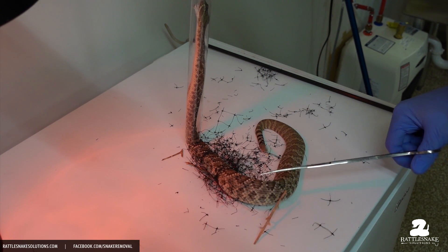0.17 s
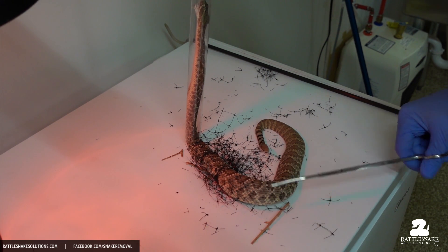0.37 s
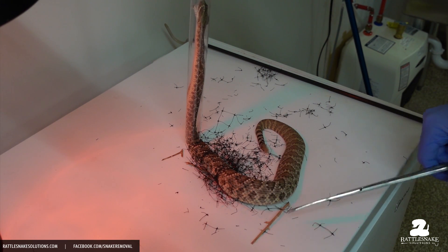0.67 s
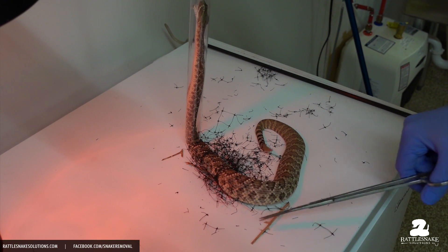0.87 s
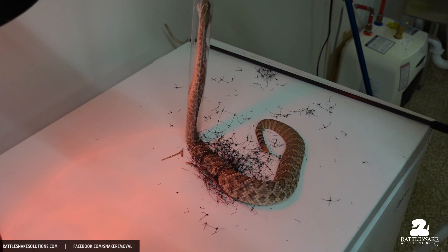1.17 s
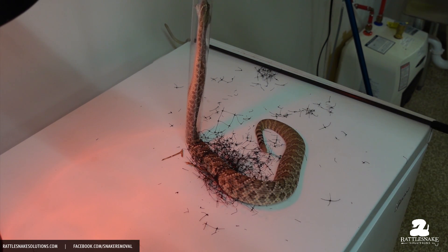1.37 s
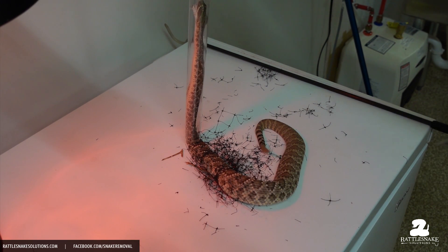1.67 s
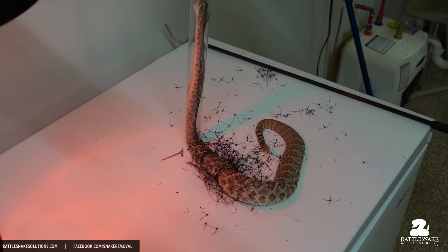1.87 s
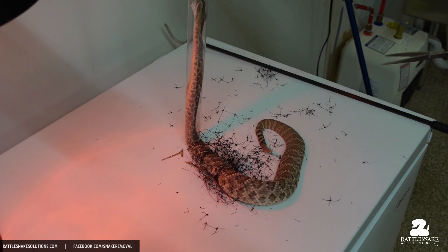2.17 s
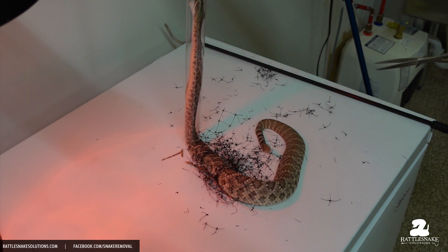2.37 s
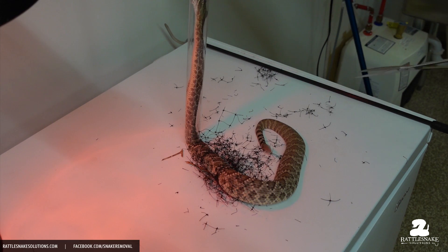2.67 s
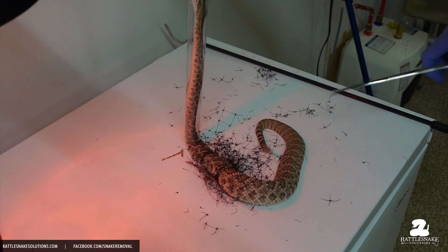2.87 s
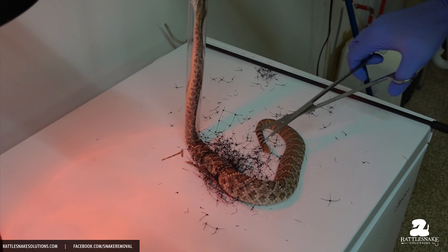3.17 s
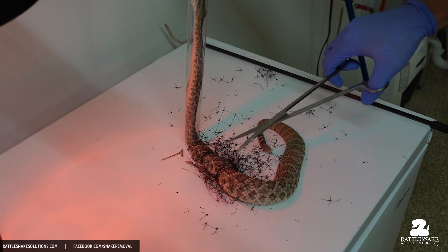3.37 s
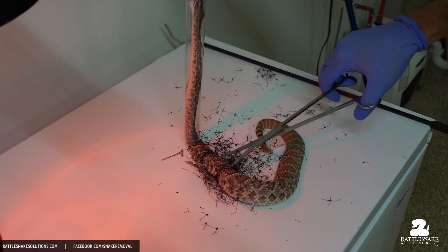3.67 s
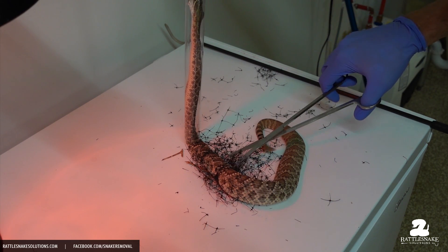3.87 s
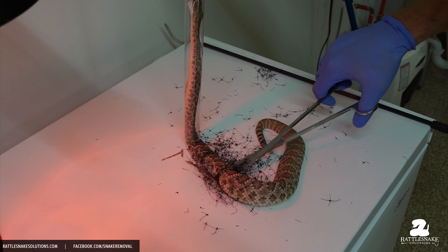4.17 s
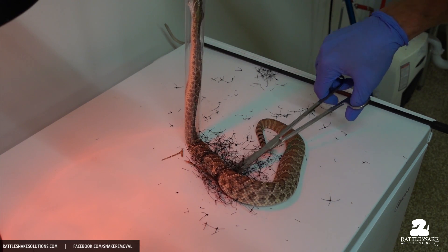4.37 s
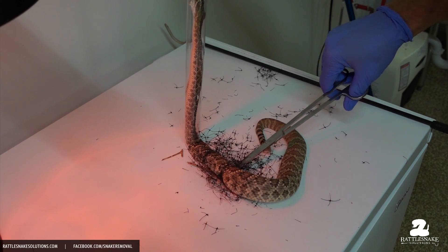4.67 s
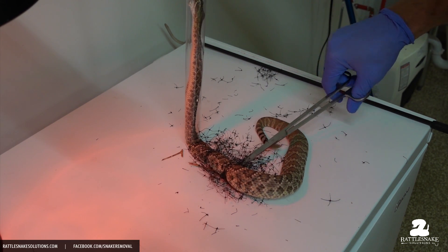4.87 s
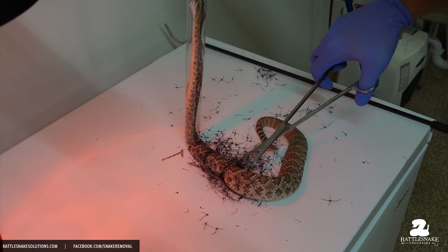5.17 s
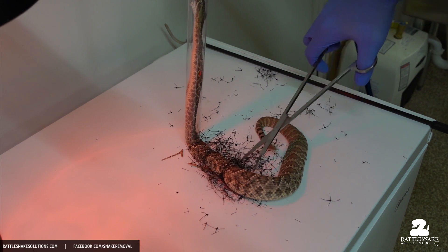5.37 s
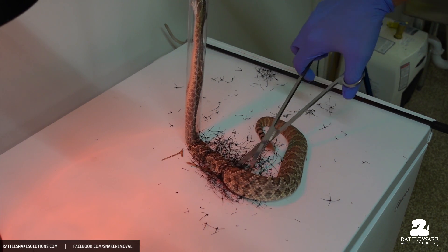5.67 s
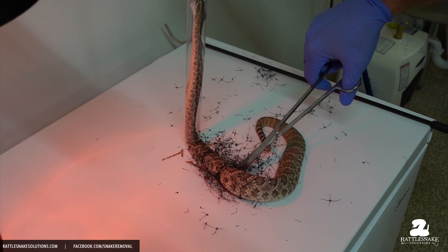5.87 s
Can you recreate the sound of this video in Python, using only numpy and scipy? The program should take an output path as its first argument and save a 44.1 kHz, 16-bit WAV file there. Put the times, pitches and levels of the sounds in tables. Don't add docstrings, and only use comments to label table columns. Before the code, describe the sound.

Loud, continuous high rattling fills a small room, a fast, grainy hiss of hollow shells with a rapid flutter. Beneath it sits a low, soft machine hum. A few padded metallic ticks and dull thumps come from tongs on a table, mostly masked. Late on, the rattle wavers more deeply and breaks into five short, dry bursts while tongs knock and scrape. Close stereo pickup with short, boxy reflections.

```python
import sys
import numpy as np
from scipy import signal
from scipy.fft import rfft, irfft, next_fast_len
from scipy.io import wavfile
from scipy.ndimage import uniform_filter1d

SR = 44100
rng = np.random.default_rng(int(sys.argv[2]) if len(sys.argv) > 2 else 0)


def file_out(sig):
    cols = np.atleast_2d(sig).T
    lim = np.clip(cols, -1, 1)
    pcm = np.round(lim * 32767).astype(np.int16)
    wavfile.write(sys.argv[1], SR, pcm)


def voltage_ratio(level):
    return 10 ** (np.asarray(level, float) / 20)


N = 264776

# time in seconds, effort in dB, how far the 5.3 kHz shell faces the
# microphone in dB.
SHAKING = [(0, -18.5, -13.5), (.7, -17.5, -12), (1.3, -17, -12.5), (1.95, -17.5, -13), (2.15, -17, -10.5),
           (3.3, -17.5, -10.5), (4, -17.5, -10.5), (4.7, -18.5, -11), (4.85, -17, -11), (4.97, -18.5, -12),
           (5.07, -15.5, -13), (5.17, -18.5, -12.5), (5.55, -17.5, -11.5), (5.63, -18.5, -10.5),
           (5.68, -22.5, -13.5)]


def evened(x):
    return x / np.sqrt(np.mean(x ** 2) + 1e-20)


def read(points, hz):
    f, value = np.transpose(points)
    return np.interp(np.log(hz + 1), np.log(f + 1), value)


def columns(rows):
    s, *rest = np.transpose(rows)
    return [np.interp(np.arange(N) / SR, s, column) for column in rest]


def add(mix, s, sound):
    part = mix[round(s * SR):][:len(sound)]
    part += sound[:len(part)]


def coloured(x, points):
    size = next_fast_len(N + 4096)
    gain = voltage_ratio(read(points, np.fft.rfftfreq(size, 1 / SR)))
    return irfft(rfft(x, size) * gain, size)[..., :N]


def butter(x, order, hz, kind):
    return signal.sosfilt(signal.butter(order, hz, kind, fs=SR, output="sos"), x)


def drift(hz):
    size = int(SR / hz)
    return evened(uniform_filter1d(uniform_filter1d(rng.standard_normal(N), size), size))


def ring(hz, t60, count=6000):
    t = np.arange(count) / SR
    return voltage_ratio(-60 * t / t60) * np.sin(2 * np.pi * hz * t)


def tail(t60, start_s, channels=2):
    at = np.arange(0, 12000, 10) + rng.integers(0, 10, (channels, 1200))
    taps = np.zeros((channels, 12000))
    np.put_along_axis(taps, at, rng.choice([-1., 1.], at.shape), 1)
    t = np.arange(12000) / SR
    taps *= voltage_ratio(-60 * t / t60) * (t > start_s)
    return taps / np.linalg.norm(taps[0])


def strokes():
    # first hard stroke in seconds, gap in
    # seconds, peak in dB, weak stroke in dB, settling in dB against the peak.
    twitches = [
        (5.699, 0.013, -3.5, 3, -33),
        (5.768, 0.0096, -4, -0.5, -16),
        (5.833, 0.012, -2, -22, -2.5),
        (5.911, 0.013, -1, -23, -13),
        (5.979, 0.012, -3, -35, -3),
    ]
    strokes_per_s, slowing_per_s, lull = 85., 1.5, 0.44
    tire_s, stop_s = 4.9, 5.685
    stroke_s, settle_s = 0.0036, 0.031
    rest_db = -29
    t = np.arange(N) / SR
    tired = np.clip((t - tire_s) / (stop_s - tire_s), 0, 1)
    throbs_per_s = 28. + (14.98 - 28.) * tired ** 2
    throb_db = 1.55 + (4 - 1.55) * tired

    turns = np.cumsum((strokes_per_s - slowing_per_s * t) * (1 + 0.07 * drift(hz=30.))) / SR
    phase = 2 * np.pi * turns
    whip = 1 + lull * np.cos(phase - np.cos(phase))
    each_stroke_db = 0.81 * rng.standard_normal(1000)
    strength_db = uniform_filter1d(each_stroke_db[(turns + .5).astype(int)], 100)
    swells = np.cumsum(throbs_per_s * (1 + 0.1482 * (1 - tired) * drift(hz=10.2))) / SR
    swells += .65 - swells[round(stop_s * SR)]
    throb = throb_db * np.cos(2 * np.pi * swells) + 0.1 * drift(hz=45.)
    even = whip * voltage_ratio(strength_db + throb)
    even *= voltage_ratio(columns(SHAKING)[0]) / np.sqrt(uniform_filter1d(even ** 2, 5000))
    out = even * np.clip((stop_s - t) / 0.0053, 0, 1) + voltage_ratio(rest_db)

    for s, gap, db, weak_db, settle_db in twitches:
        for at, strength in ((s - gap * 0.8, voltage_ratio(weak_db)), (s, 1), (s + gap, voltage_ratio(2.1))):
            out += voltage_ratio(db - 9.5) * strength * np.exp(-((t - at) / stroke_s) ** 2)
        from_middle = abs(t - s - gap - settle_s / 2) / (settle_s * 0.43)
        out += voltage_ratio(db - 18.5 + settle_db) * np.exp(-np.minimum(from_middle, 9) ** 4)
    return out


def shells(clicks):
    # pitch in Hz, width in Hz, level in dB.
    shell_rings = [(3028, 240, 16), (4200, 99, -2), (4833, 264, -7), (5360, 280, 4), (5884, 204, -5),
                   (6410, 190, -5), (6866, 95, 11), (7555, 92, 7), (8130, 72, -37), (9480, 21, -17),
                   (10090, 45, 25), (12000, 180, -20), (12700, 300, 0), (13700, 180, -12)]
    facing_db = columns(SHAKING)[1]
    facing_db = facing_db - facing_db.mean()
    hidden_db = -11.5 * (np.arange(N) / N - .5)
    segment = rng.integers(0, 4, N)
    out = np.zeros(N)
    for k, (hz, width, db) in enumerate(shell_rings):
        shell = ring(hz, 3.2 / width, count=1500)
        shell *= 4 / abs(shell).sum()
        turned_db = facing_db * (2.4 * (abs(hz - 5330) < 250) - 1.3 * (abs(hz - 6400) < 250))
        turned_db = turned_db + hidden_db * (abs(hz - 4800) < 200)
        loud = voltage_ratio(turned_db + 1.43 * drift(hz=6.6))
        out += voltage_ratio(0.14 * db - 2.5) * loud * signal.oaconvolve(clicks * (segment == k % 4), shell)[:N]
    return out


def rattle():
    # frequency in Hz, level in dB per Hz.
    click_colour = [(900, -58), (1900, -41), (2180, -41), (2300, -19.5), (2650, -19), (2950, -15),
                    (3450, -10), (4200, -8.5), (5300, -3.5), (7700, -0.5), (9000, -6.5), (12100, -14),
                    (14000, -15.5), (16500, -16.5)]
    # delay in seconds, level in dB.
    echoes = [(.00075, -26), (.00112, -28), (.00187, -55), (.00376, -20.5)]
    clicks_per_s = 8000.
    size = voltage_ratio(1.73 * np.minimum(rng.exponential(1, N), 4))
    size *= (rng.random(N) < clicks_per_s / SR) * rng.choice([-1, 1], N)
    force = strokes()
    clicks = evened(size) * force
    out = voltage_ratio(-2.0) * clicks + shells(clicks)

    path = np.zeros(400)
    path[0] = 1
    for s, db in echoes:
        path += voltage_ratio(db) * np.sinc(np.arange(400) - s * SR)
    out = coloured(signal.oaconvolve(out, path)[:N], click_colour)

    top = signal.sosfiltfilt(signal.butter(6, 11400., "high", fs=SR, output="sos"), out)
    low = signal.sosfiltfilt(signal.butter(2, 5000., "low", fs=SR, output="sos"), out)
    top_db = 1. - 8. * (np.arange(N) / N) ** 2
    top_db += 0.13 * 20 * np.log10(force / force.mean())
    out += top * (voltage_ratio(top_db + 1.06 * drift(hz=90.)) - 1) + low * (voltage_ratio(0.99 * drift(hz=99.0)) - 1)
    return evened(out) * np.sqrt(np.mean(clicks ** 2)) * voltage_ratio(-2.0)


def scattered(x, t60, start_s):
    turn = 2 * np.pi * 2.3 * np.arange(N) / SR
    shifting = x * np.array([np.cos(turn), np.sin(turn)])
    return signal.fftconvolve(shifting, tail(t60, start_s), axes=1)[:, :N].sum(0)


def snake_in_room():
    # frequency in Hz, level in dB.
    wall_colour = [(3000, -7), (8000, -0.5), (11000, 3.5), (16000, -8)]
    # frequency in Hz, level in dB.
    side_colour = [(60, -19), (130, -10), (290, -6), (640, -1), (1410, -49), (3100, -24), (6820, -19.5),
                   (15000, -6.5)]
    snake = rattle()
    walls = coloured(scattered(snake, t60=0.089, start_s=0.0041), wall_colour)
    side = scattered(snake, t60=0.1, start_s=0) + voltage_ratio(-17.0) * scattered(snake, t60=.2, start_s=0.0036)
    side = coloured(side, side_colour)
    balance = voltage_ratio([[-.45], [.45]])
    return (snake + voltage_ratio(-8.5) * walls) * balance + voltage_ratio(-3.0) * side * np.array([[1], [-1]])


def hum():
    # frequency in Hz, level in dB per Hz.
    hum_colour = [(24, -54), (40, -28), (59, -39), (73, -21), (86, -9.5), (139, -4), (173, -12),
                  (270, -2.5), (378, -4.5), (409, -14), (563, -6.5), (838, -11.5), (1460, -11.5),
                  (1800, -8.5), (2340, -8.5), (3960, -120)]
    # frequency in Hz, likeness from 0 to 1.
    likeness = [(60, 0.98), (130, 0.91), (290, 0.7), (640, 0.47), (1410, 0.53), (3100, 1.0), (6820, 0.99),
                (15000, 0.88)]
    frames, hz = N // 256 + 5, np.fft.rfftfreq(1024 * 2, 1 / SR)
    a, b, c, d, patches = rng.standard_normal((frames // 2, 1025, 5)).T
    patches = evened(uniform_filter1d(uniform_filter1d(patches, 10, 0), 6, 1))
    same = np.clip(read(likeness, hz), -1, 1)[:, None]
    left = a + 1j * b
    right = same * left + np.sqrt(1 - same ** 2) * (c + 1j * d)
    z = np.array([left, right]) * voltage_ratio(read(hum_colour, hz)[:, None] + 1.5 * patches)
    return voltage_ratio(-46.5) * evened(signal.istft(z, nperseg=2048, noverlap=1536)[1][:, :N])


def knocks():
    # start in seconds, tick in dB, weight (boom against the tick) in dB,
    # boom pitch in Hz, tick ring in Hz.
    hits = [(0.356, -25.5, -29, 132, 1740), (0.41, -29, -30, 195, 1850), (1.057, -18.5, -9, 145, 1940),
            (1.088, -31, 1, 139, 1880), (1.13, -35, -4, 171, 1730), (1.236, -34.5, -8, 215, 1680),
            (1.594, -35, -5, 303, 697), (4.503, -36.5, -10, 314, 1750), (4.617, -37, -17, 213, 1730),
            (5.445, -36, -4, 325, 1340), (5.773, -29.5, -5, 146, 1680), (5.812, -29, -10, 128, 1710),
            (5.864, -21.5, -1.5, 139, 1680), (5.926, -33.5, -1, 145, 1700), (5.944, -34, 9, 263, 1670),
            (5.965, -36.5, 14, 266, 1700), (5.987, -34.5, 9, 280, 1800)]
    # pitch in Hz, level in dB, t60 in seconds.
    sheet_modes = [(354, -12, 0.054), (458, -14, 0.075), (768, -10, 0.04), (1012, 6.5, 0.012),
                   (1340, -10.5, 0.031), (2090, -11, 0.052), (2280, 1.5, 0.017)]
    out = np.zeros(N)
    t = np.arange(6000) / SR
    scuffs = .008 * rng.standard_normal((len(hits), 3000)) * np.exp(-t[:3000] / .015)
    scuffs[:, 0] += 1
    for (s, db, boom_db, boom_hz, tick_hz), scuff in zip(hits, scuffs):
        sheet_db = 0.34 * min(boom_db, -9.)
        sheet = sum(voltage_ratio(mode_db + sheet_db) * ring(hz, t60) for hz, mode_db, t60 in sheet_modes)
        sheet += voltage_ratio(-3.0) * ring(tick_hz, 0.027)
        sheet *= 1 - np.exp(-t / 0.0015)
        tick = signal.oaconvolve(sheet, scuff)[:6000]
        boom = ring(boom_hz, 6.5 / boom_hz) * (1 - np.exp(-t / .012))
        add(out, s, voltage_ratio(db + 6.0) * tick + voltage_ratio(db + boom_db + 20.0) * boom)
    return butter(out, 4, 80., "high")


def slides():
    # start in seconds, length in seconds, level in dB,
    # ring in Hz.
    drags = [
        (5.407, 0.054, -47, 1326),
        (5.769, 0.071, -42, 1710),
        (5.864, 0.018, -31.5, 1746),
        (5.927, 0.019, -37, 1725),
    ]
    out, t = np.zeros(N), np.arange(6000) / SR
    for (s, length, db, hz), grit in zip(drags, rng.standard_normal((len(drags), 6000))):
        waver = evened(uniform_filter1d(grit, 150))
        drag = np.sin(2 * np.pi * np.cumsum(hz + 20.0 * waver) / SR)
        drag *= voltage_ratio(2.5 * np.roll(waver, 3000) + 0.5)
        fade = np.clip(np.minimum(t, length - t) / 0.0045, 0, 1)
        add(out, s, voltage_ratio(db) * drag * fade)
    return out


def tongs_in_room():
    taps = knocks() + slides()
    room, apart = signal.fftconvolve(taps[None], tail(t60=0.36, start_s=0.0074), axes=1)[:, :N]
    room = butter(room, 2, [230., 800.], "band")
    apart = butter(apart, 2, 450., "high")
    return taps + voltage_ratio(2.5) * room + voltage_ratio(-12.0) * apart * np.array([[1], [-1]])


def scene():
    return snake_in_room() + tongs_in_room() + hum()


def top_cut(x):
    return signal.sosfilt(signal.butter(12, 16240, fs=SR, output="sos"), x)


def record(dry):
    limited = .95 * np.tanh(dry / .95)
    edge = signal.firwin(1535, 15730, window=("kaiser", 7), fs=SR)[None]
    return top_cut(signal.oaconvolve(limited, edge, "same"))


dry = scene()
out = record(dry)
file_out(out)
```